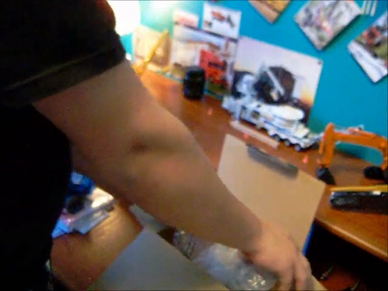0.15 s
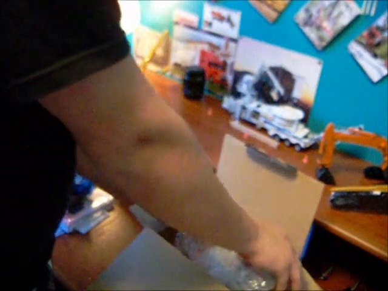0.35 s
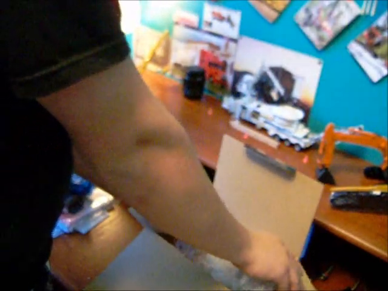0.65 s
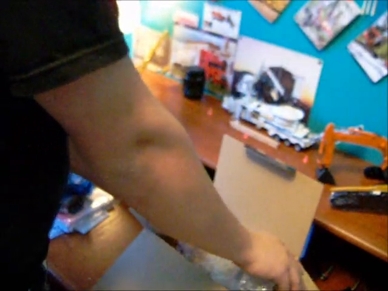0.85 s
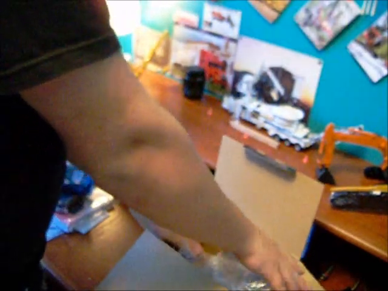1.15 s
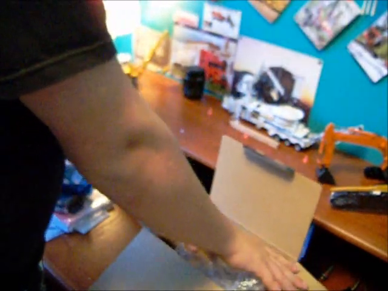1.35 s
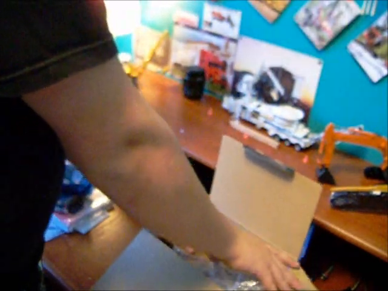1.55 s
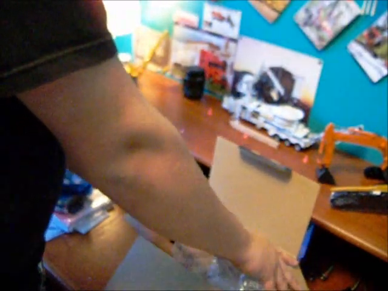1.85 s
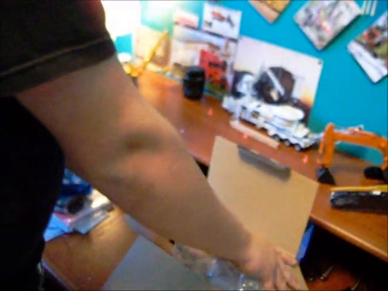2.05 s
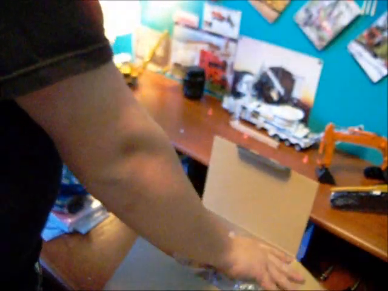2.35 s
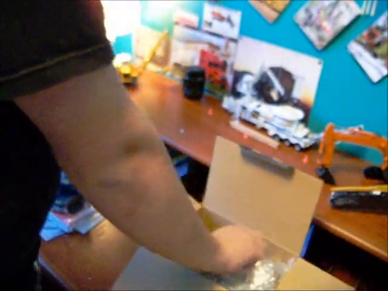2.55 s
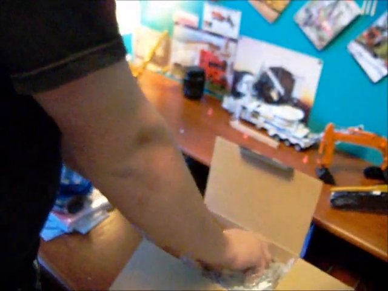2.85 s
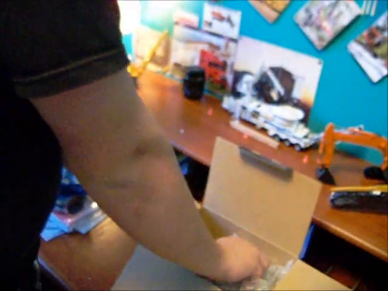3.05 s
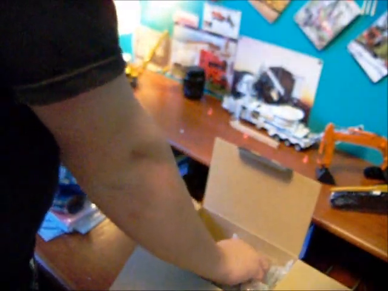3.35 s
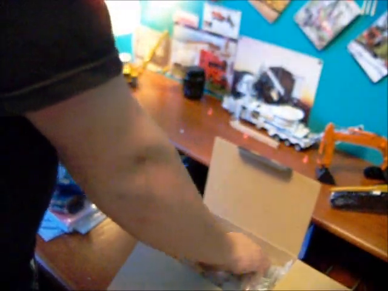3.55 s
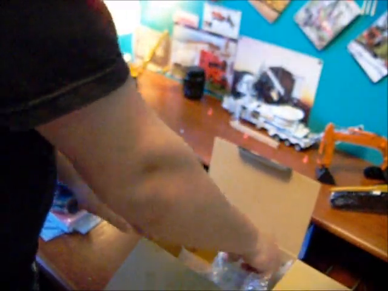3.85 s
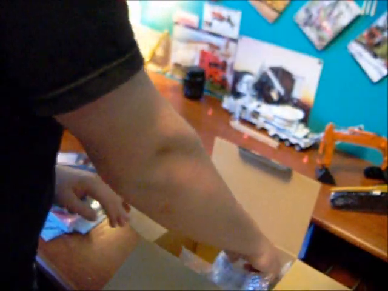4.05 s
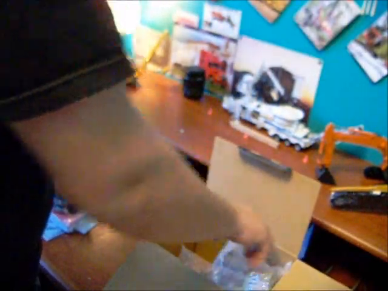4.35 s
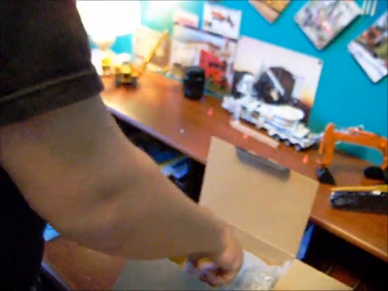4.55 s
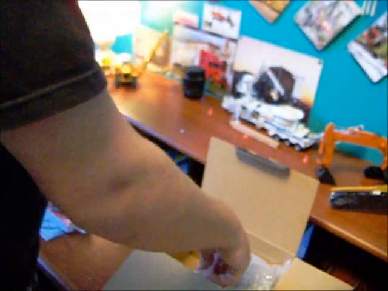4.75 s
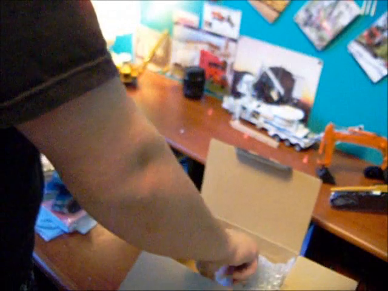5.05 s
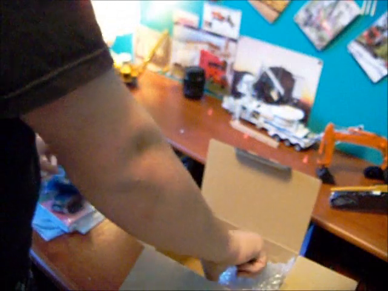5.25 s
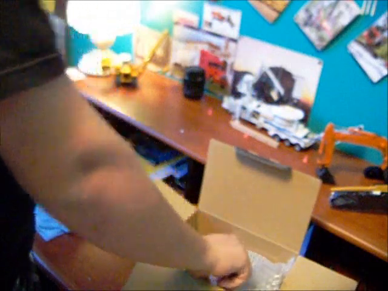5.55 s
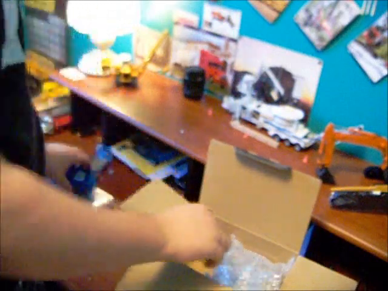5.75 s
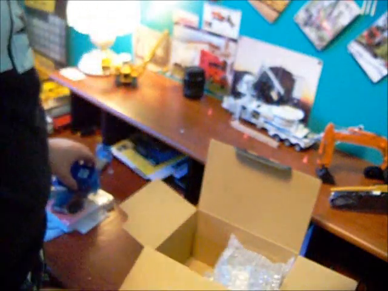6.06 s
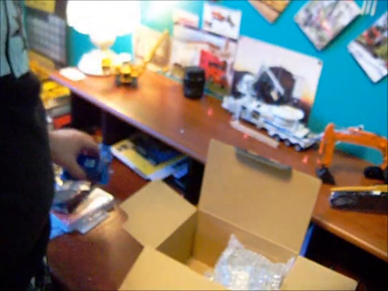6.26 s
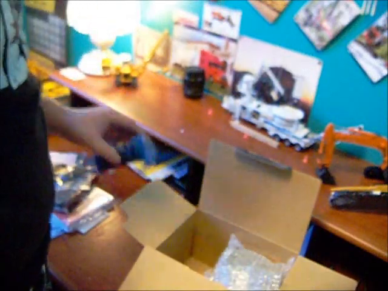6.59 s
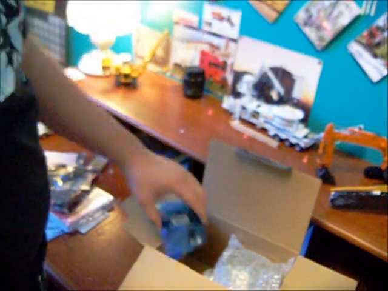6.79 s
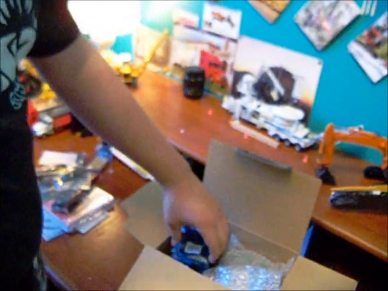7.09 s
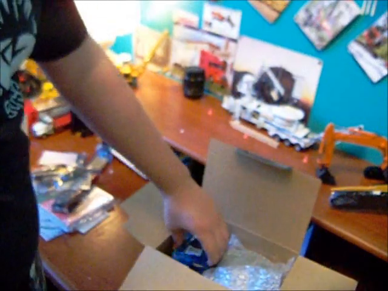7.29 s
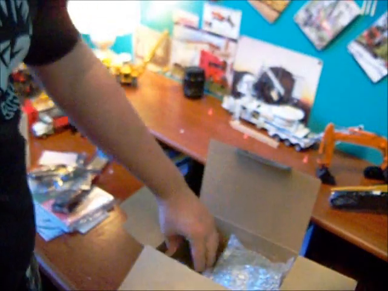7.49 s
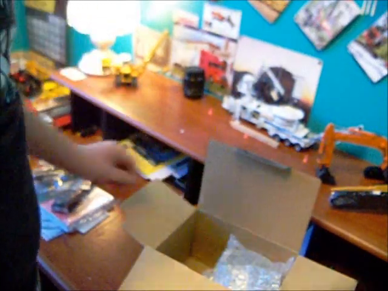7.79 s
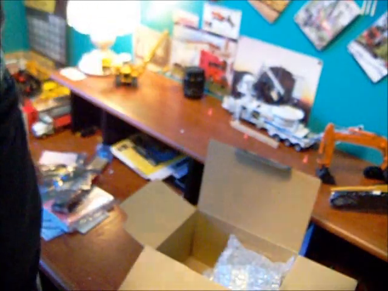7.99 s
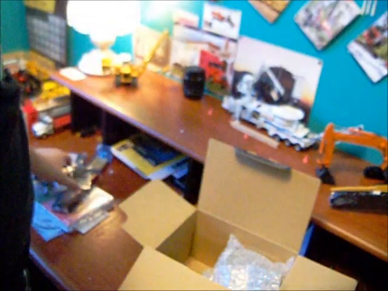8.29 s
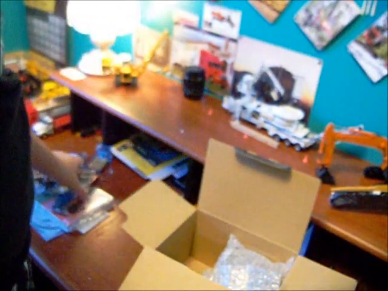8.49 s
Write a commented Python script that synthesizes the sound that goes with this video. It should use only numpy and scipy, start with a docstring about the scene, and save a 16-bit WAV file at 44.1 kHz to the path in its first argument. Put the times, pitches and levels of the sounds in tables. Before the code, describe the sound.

Close plastic film crackling, bright popping snaps and boxy cardboard thumps, thinning to near quiet before one last hard knock and rustle.

```python
"""Bubble wrap crinkles and snaps as hands press and fold it into a cardboard box on a desk, close to
a small camera's microphone. Crinkle is a crowd of tiny damped sines with hiss; each snap is a flurry of them.
Parts knock and drag on the hollow box, noise ringing through its panel resonances; plastic hisses in
narrow bands. A small room answers with decaying noise, over a gently unsteady rumble and hiss."""
import sys
import numpy as np
from scipy import signal
from scipy.fft import rfft, irfft, next_fast_len
from scipy.io import wavfile
from scipy.ndimage import map_coordinates

SR = 44100
rng = np.random.default_rng(int(sys.argv[2]) if len(sys.argv) > 2 else 0)


def unload_wav(signal):
    """Save mono or channel-first audio to the path in sys.argv[1] as 16-bit WAV at rate SR, clipped to [-1, 1]."""
    wavfile.write(
        sys.argv[1],
        SR,
        np.round(np.clip(np.atleast_2d(signal).T, -1, 1) * 32767).astype(np.int16),
    )


def volts(x):
    """Linear amplitude factor 10**(x/20) for a level x in dB, scalar or array-like."""
    e = np.asarray(x, float) / 20
    return 10 ** e


N = 380583

# loud creases of the film that snap: (time [s], level [dB], centre of its colour [Hz])
LOUD_SNAPS = [(0.2111, -27, 3980), (0.2444, -25, 3620), (0.2607, -29.5, 5800), (0.4961, -22, 2114),
              (0.5954, -16.5, 2450), (0.6088, -5.5, 2904), (0.6392, -9, 3410), (0.6745, -3, 2630),
              (0.6901, -6, 3670), (0.9224, -30, 6000), (0.9447, -31, 4500), (0.9654, -25, 6050),
              (0.7959, -26.5, 5600), (0.999, -24.5, 6100), (1.0336, -31, 5000), (1.2426, -32.5, 4800),
              (1.225, -29.5, 6100), (1.3433, -26, 5320), (1.3611, -22, 4200), (1.568, -32, 3300),
              (1.593, -23.5, 5040), (1.6197, -22, 2890), (1.77, -24.5, 5800), (1.878, -25, 5360),
              (1.9371, -21.5, 2500), (2.009, -28, 3330), (2.2925, -12, 3390), (2.3431, -15, 4120),
              (2.3584, -13.5, 5700), (2.4323, -15.5, 4800), (2.5606, -14.5, 6160), (2.5823, -12, 5160),
              (2.5924, -19.5, 4850), (2.652, -12, 6250), (2.7208, -24.5, 4900), (2.7548, -24.5, 5000),
              (2.766, -24.5, 3750), (2.809, -27, 5300), (2.828, -17, 6860), (2.8638, -25, 4650),
              (2.9026, -26, 5480), (2.9505, -24, 4600), (2.9582, -21.5, 5630), (2.9958, -19, 5750),
              (3.016, -18, 6130), (3.028, -21, 5100), (3.068, -22, 5030), (3.0924, -22, 5170),
              (3.1187, -23, 4770), (3.1256, -25, 4760), (3.153, -22.5, 5520), (3.1992, -30, 5920),
              (3.232, -32, 3400), (3.2371, -5, 3880), (3.3848, -29, 3910), (3.4953, -40, 2900),
              (3.547, -20, 2980), (3.5717, -19.5, 4920), (3.6161, -21.5, 4860), (3.693, -31, 5270),
              (3.7171, -15.5, 5300), (3.8478, -26, 3750), (3.7927, -27, 4500), (3.865, -22, 5500),
              (3.8756, -24, 5900), (3.915, -33, 6240), (3.9855, -24, 6230), (3.9985, -30, 6100),
              (4.055, -18, 3880), (4.0661, -16, 3250), (4.1236, -28.5, 3100), (4.217, -26, 2270),
              (4.263, -27, 4730), (4.354, -21, 5400), (4.3227, -16.5, 4900), (4.491, -16, 5080),
              (4.5021, -14.5, 5600), (4.6193, -10.5, 4770), (4.512, -21, 5550), (4.661, -22, 4960),
              (4.756, -22.5, 4340), (4.728, -24, 5800), (4.8912, -24.5, 4810), (4.9566, -15.5, 4080),
              (4.9808, -14.5, 3980), (5.0139, -12.5, 5330), (5.06, -19, 4940), (5.0701, -12.5, 4790),
              (5.108, -23.5, 5700), (5.3729, -14, 4000), (5.567, -21, 4670), (5.6013, -15, 3860),
              (5.6097, -13, 4500), (5.3217, -25, 4030), (5.4566, -31.5, 5200), (5.8062, -34, 4460),
              (5.96, -16.5, 3980), (6.2, -36.5, 2230), (6.2423, -37, 4940), (6.467, -37.5, 5200),
              (6.8159, -36.5, 4370), (6.8826, -20, 3090), (6.927, -19.5, 4500), (6.967, -24.5, 4250),
              (7.043, -18.5, 5200), (7.054, -25, 4700), (7.0993, -17.5, 4930), (7.103, -26.5, 5440),
              (7.12, -18.5, 4780), (7.1571, -20.5, 4450), (7.1383, -29.5, 4250), (7.2205, -20, 4580),
              (7.258, -31, 4400), (7.329, -18, 3620), (7.5013, -26, 5900), (7.53, -30, 2020),
              (7.5382, -4, 2780), (7.6124, -17, 2150), (8.386, -28, 3800), (8.5706, -29, 3160),
              (8.6077, -23, 3730)]
# blows on the box: (time [s], blow level [dB], panel struck [Hz], panel ring over the blow [dB],
# hardness as reach above the panel [octaves])
BOX_BLOWS = [(0.093, -43, 167, 3, 3.5), (0.492, -28.5, 489, -3, 1.6), (0.594, -17.5, 473, -3.5, 0.9),
             (0.635, -24, 414, -3, 1.4), (0.671, -18.5, 450, -1, 1.4), (0.688, -32, 405, -5, 1),
             (1.049, -39.5, 466, -9, 3), (1.616, -30, 1300, -5, 1.3), (1.649, -35, 323, 3, 0.98),
             (1.69, -42, 338, 1, 1.3), (1.728, -42, 427, 5, 0.61), (1.909, -37.5, 445, -4, 1.5),
             (1.933, -26, 742, 0.5, 1.4), (1.965, -35.5, 734, 2, 2.6), (2.287, -33.5, 530, -23, 0.91),
             (2.308, -35, 470, -1, 1.5), (2.585, -40.5, 471, 4, 1.1), (2.966, -38.5, 484, -2.5, 1.1),
             (3.238, -23, 460, -1.5, 1.9), (3.237, -26.5, 1210, 5, 0.9), (3.518, -39, 460, 3.5, 1.1),
             (4.065, -38.5, 489, -1.5, 2), (4.216, -29, 425, -1.5, 0.57), (4.251, -39, 423, -4, 0.79),
             (4.32, -34.5, 331, -5, 1.4), (4.519, -22.5, 325, -12, 4.2), (4.619, -35.5, 460, 12.5, 0.67),
             (4.68, -54, 487, 16, 1.2), (4.952, -36.5, 457, -3, 1.3), (4.981, -28.5, 446, -12, 3.5),
             (5.065, -39.5, 456, -2, 1.8), (5.371, -37, 564, 0.5, 1.5), (5.41, -42, 700, -3, 1.3),
             (5.601, -33, 460, -10, 0.99), (6.882, -22, 877, -5, 2), (6.886, -30.5, 134, -2, 1.1),
             (6.909, -31.5, 281, 3.5, 0.76), (6.987, -45, 178, 6, 1.2), (7.066, -44.5, 191, 6.5, 1.2),
             (7.326, -36.5, 740, -15, 2.1), (7.349, -34.5, 738, -4, 1.3), (7.532, -15, 348, 2, 0.62),
             (7.538, -25, 202, 2.5, 0.8), (7.54, -28, 1044, 4, 1.1), (7.542, -37, 116, 0.5, .8),
             (7.563, -32, 370, 6, 0.88), (7.586, -43, 326, -3, 1.3), (7.608, -28, 279, -1, 2.3)]
# hands pressing the film: (time [s], crinkle level [dB])
PRESSING = [(0, -39), (.25, -47), (.45, -41.5), (.8, -45.5), (1.2, -54), (1.55, -51.5), (2.1, -47),
            (2.7, -43), (3.2, -54.5), (3.45, -61), (4.2, -56), (4.86, -55), (5.2, -59), (5.5, -55),
            (5.76, -64), (6.1, -71), (6.78, -64), (7.0, -60), (7.28, -48), (7.6, -59), (7.75, -78),
            (8.36, -72), (8.63, -50)]


def unit(x):
    """Scale to rms 1."""
    return x / np.sqrt(np.mean(x ** 2) + 1e-20)


def along(points, hz):
    """(Hz, value) points read on a log frequency axis."""
    f, v = np.transpose(points)
    return np.interp(np.log(hz + 1), np.log(f + 1), v)


def filtered(x, response):
    """x shaped by a complex response of frequency."""
    m = next_fast_len(N + SR // 2)
    return irfft(rfft(x, m) * response(np.fft.rfftfreq(m, 1 / SR)), m)[:N]


def wobble(rate):
    """A smooth random curve, rate knots a second."""
    knots = rng.standard_normal(int(N * rate / SR) + 4)
    return map_coordinates(knots, [np.arange(N) * rate / SR])


def bursts(s, shapes):
    """Rows of samples added at their times s."""
    where = np.round(s * SR).astype(int)[:, None] + np.arange(shapes.shape[1])
    return np.bincount(where.ravel(), shapes.ravel(), N + SR)[:N]


def grains(s, hz, size, cycles, count):
    """Damped sines of count samples, each falling to 1/e in the given cycles."""
    turns = np.outer(hz / SR, np.arange(count))
    return bursts(s, size[:, None] * np.sin(2 * np.pi * turns) * np.exp(-turns / cycles))


def floor():
    """Low rumble of the house and hiss of the microphone: shaped noise, gently unsteady."""
    # rumble and hiss: (frequency [Hz], relative spectral level [dB])
    floor_colour = [(10, -8), (25, 1), (60, -1.5), (150, -5.5), (300, -12.5), (600, -20), (1500, -25.5),
                    (4000, -29.5), (8000, -32.5)]
    noise = filtered(rng.standard_normal(N), lambda f: volts(along(floor_colour, f)))
    return volts(-50 + 0.37 * wobble(3.5)) * unit(noise)


def room(x):
    """The walls' answer: noise tails in which each frequency dies at its own speed."""
    # decay of the room: (frequency [Hz], t60 [s])
    decay = [(150, 0.22), (700, 0.38), (2000, 0.25), (7000, 0.13)]
    wet, step = np.zeros(N + SR), SR // 4
    # the source moves, so every quarter second has a new tail
    for start in range(0, N, step):
        hz, t, z = signal.stft(rng.standard_normal(SR // 2), SR, nperseg=256)
        t60 = along(decay, hz)[:, None]
        tail = signal.istft(z * volts(-60 * t / t60), SR, nperseg=256)[1]
        echo = signal.fftconvolve(x[start:start + step], tail / np.linalg.norm(tail))
        wet[start + 130:][:len(echo)] += echo  # the walls answer about 3 ms late
    return wet[:N]


def box(x):
    """The hollow box rings at its panel and cavity resonances."""
    # panels and cavity: (frequency [Hz], width [Hz], level [dB])
    panels = [(122.5, 17, -12), (209, 31, -6.5), (323.4, 45, -7), (460, 53, -5), (583, 95, -8.5),
              (715, 333, -11.5), (1080, 275, -12), (1300, 335, -11), (1880, 500, -20.5)]

    def response(f):
        total = 0
        for k, (centre, width, db) in enumerate(panels):
            damping = 1j * f * width
            total = total + (-1) ** k * volts(db) * damping / (centre ** 2 - f ** 2 + damping)
        return total

    return filtered(x, response)


def knocks():
    """A blow is a rough push into the box around the panel struck: hard contact reaches higher, the panel rings on."""
    s, db, hz, panel_db, hardness = np.transpose(BOX_BLOWS)
    t = np.arange(2048) / SR
    envelope = np.exp(-t / 0.00376) * (1 - np.exp(-t / 0.0026))  # contact fall and rise times [s]
    push = rng.standard_normal((len(s), len(t))) * envelope
    # second-order low cut near the panel, high cut at the reach of the contact
    ratio = 1j * np.fft.rfftfreq(2 * len(t), 1 / SR) / hz[:, None]
    low = ratio * 1.03
    high = ratio / 2 ** np.clip(hardness, 0, 4)[:, None]
    push = irfft(rfft(push, 2 * len(t)) * (low / (1 + low)) ** 2 / (1 + high) ** 2)
    push /= np.linalg.norm(push, axis=1, keepdims=True)
    blows = bursts(s, 50 * volts(db)[:, None] * push)
    panel_ring = grains(s + 0.0012, hz, volts(db + panel_db), 4.6, count=4000)
    return box(blows) + 0.071 * blows + panel_ring


def swishes():
    """Plastic sliding on card hisses in a narrow band for a moment."""
    # slides: (start [s], end [s], centre [Hz], spread [Hz], level [dB])
    slides = [(4.537, 4.537, 1840, 201, -27), (5.808, 5.962, 5140, 600, -51.5),
              (5.964, 6.02, 2480, 500, -57), (7.43, 7.482, 4100, 910, -45.5)]
    t, out = np.arange(N) / SR, np.zeros(N)
    for start, stop, hz, width, db in slides:
        hiss = filtered(rng.standard_normal(N), lambda f: np.exp(-.5 * ((f - hz) / width) ** 2))
        envelope = np.interp(t, [start, start + 0.0032, stop, stop + 0.024], [0, 1, 1, 0])
        out += volts(db) * unit(hiss) * envelope
    return out


def squeezes(s):
    """Squeezing the film swells its crinkle: summed power of fine crinkle and large folds at times s."""
    # squeezes: (peak time [s], level [dB], rise [dB/s], fall [dB/s], large folds over fine crinkle [dB])
    swells = [(.08, -46.5, 89, 102.5, 5), (.514, -41.5, 302, 103, 2.5), (.603, -32.5, 900, 171.5, 2),
              (.694, -40, 198, 200, 0.5), (.98, -42, 81, 55, -4), (1.05, -49.5, 100, 118, 3),
              (1.324, -42, 100, 34, -4), (1.639, -43.5, 153, 28, 0.5), (1.936, -34.5, 500, 140, -7),
              (2.178, -36, 111, 110, -5), (2.307, -33, 170, 55, 0.5), (2.43, -46, 102, 118, -3),
              (2.58, -24.5, 350, 330, -9), (2.875, -40, 118, 120, -6), (2.966, -39.5, 300, 56, -2),
              (3.04, -38, 103, 141, -2), (3.138, -42, 136, 190, -10), (3.254, -32.5, 1097, 225, 1),
              (3.542, -48.5, 205, 65, -1), (3.632, -45.5, 65, 300, 5.5), (3.732, -42, 162, 42, -4),
              (3.87, -38.5, 46, 75, -8), (4.076, -43.5, 252, 110, -7.5), (4.343, -33.5, 148, 203, -5),
              (4.495, -32, 1003, 38, -0.5), (4.624, -35.5, 200, 90, -12), (4.735, -31.5, 500, 44, -5),
              (4.815, -37.5, 60, 252, -3), (4.895, -40, 300, 100, -9), (4.97, -28.5, 140, 156, -4.5),
              (5.07, -29, 500, 170, -5.5), (5.268, -39.5, 124, 66, -6.5), (5.38, -40.5, 377, 90, 0),
              (5.607, -40.5, 73, 128, 2), (5.84, -49.5, 130, 48, 2.5), (5.979, -50.5, 100, 210, 9.5),
              (6.236, -59, 270, 60, 3), (6.89, -44.5, 250, 53, 6.5), (6.974, -51.5, 75, 300, 5),
              (7.114, -43, 150, 50, -5), (7.348, -51, 104, 220, 10.5), (7.44, -63, 300, 43, 8),
              (7.508, -38, 250, 116, 5.5), (8.396, -48, 1000, 123, 2), (8.471, -53.5, 115, 280, 5.5),
              (8.588, -42.5, 122, 300, 6)]
    peak, db, rise, fall, folds_db = np.transpose(swells)
    since = s[:, None] - peak
    drop_db = np.where(since > 0, np.abs(fall) * since, -np.abs(rise) * since)
    power = volts(db - drop_db) ** 2
    return power.sum(axis=1), (power * volts(folds_db) ** 2).sum(axis=1)


def small_snaps(count=140):
    """Lesser creases snap at chance moments, their level following the pressing: rows like the loud ones."""
    z = rng.standard_normal((count, 2))
    s = rng.random(count) * (N / SR - .1)
    crinkle_db = 10 * np.log10(volts(np.interp(s, *np.transpose(PRESSING))) ** 2 + squeezes(s)[0])
    db = crinkle_db + 8 + 2.5 * z[:, 0]  # 8 dB over the crinkle of the moment, spread 2.5 dB
    hz = 5200 * np.exp(.15 * z[:, 1])
    return np.transpose([s, db, hz])


def snaps(count=24):
    """A crease lets go in a flurry: ticks all over its colour range within a few ms, the first ones strongest."""
    s, db, hz = np.vstack([LOUD_SNAPS, small_snaps()]).T
    # lower creases let go more slowly
    flurry_s = np.clip(.7 * (4500 / hz) ** 1.6, .2, 8) * 1.5 / 1000
    draw = rng.random((len(s), 3, count))
    place = draw[:, 0].argsort(1) / (count - 1) - .5  # shuffled even places in the colour range
    late = -np.log(1 - draw[:, 1]) * np.arange(count) / count  # in flurry lengths
    pitch = np.clip(hz[:, None] * np.exp(1.095 * place), 700, 9000)
    sign = np.sign(draw[:, 2] - .5)
    size = volts(db[:, None] - 1.9 * late) * 0.24 * (pitch / hz[:, None]) ** .6 * sign
    when = s[:, None] + late * flurry_s[:, None]
    # the first, broad break
    crack = grains(s, np.full(len(s), 6000), 0.38 * volts(db), 0.5, count=40)
    return crack + grains(when.ravel(), pitch.ravel(), size.ravel(), 2.3, count=160)


def crinkle(count, spread_db, clump_db):
    """Countless tiny creases buckle at random, a few much louder than the rest, in clumps."""
    # colour of the crinkle: (frequency [Hz], relative spectral level [dB])
    film_colour = [(300, -41), (1000, -15), (2000, -2.5), (3500, 0.5), (5000, 2.5), (7000, 5), (9000, 4)]
    u = rng.random((count, 3))
    hz = 1200 * (9000 / 1200) ** u[:, 1]
    size = volts(-spread_db * np.log(1 - .995 * u[:, 2])) * np.sqrt(hz)
    ticks = unit(grains(u[:, 0] * N / SR, hz, size, 2.44, count=64))
    sheet = ticks + .5 * rng.standard_normal(N)  # film sliding on film
    sheet = filtered(sheet, lambda f: volts(along(film_colour, f)))
    return unit(sheet * volts(clump_db * wobble(25) + 1.75 * wobble(90)))


def level_db(curve, events, after_db, t60, s):
    """A slow level curve plus a dying wake behind each event, read at times s."""
    since = s[:, None] - np.array([row[0] for row in events])
    wake_db = np.array([row[1] for row in events]) + after_db - 60 * since / t60
    wake = np.where(since > 0, volts(np.minimum(wake_db, 0)) ** 2, 0).sum(axis=1)
    return 10 * np.log10(volts(np.interp(s, *np.transpose(curve))) ** 2 + wake)


def hands():
    """Pressing crinkles the film, large folds sound lower; dragging rasps the cardboard and drives the box."""
    # drag on the cardboard: (time [s], level [dB])
    dragging = [(0.0, -49), (0.43, -55.5), (0.65, -43.5), (0.81, -70), (1.34, -68), (1.87, -53),
                (2.43, -48.5), (2.66, -58), (3.99, -58.5), (4.71, -49.5), (5.29, -56.5), (5.48, -53),
                (6.13, -66), (6.61, -63.5), (7.55, -55), (7.76, -71), (8.29, -67.5), (8.63, -50.5)]
    s = np.arange(0, N, 64) / SR
    # the film rustles on after a loud snap; the contents scrape and settle after a blow
    film_db = level_db(PRESSING, LOUD_SNAPS, after_db=-25, t60=0.2, s=s)
    drag_db = level_db(dragging, BOX_BLOWS, after_db=-13, t60=0.25, s=s)
    # the share of large folds grows with drag over crinkle
    folds_db = film_db - 0.5 + 0.31 * (drag_db - film_db)
    fine, large = np.sqrt(volts([film_db, folds_db]) ** 2 + squeezes(s))
    t = np.arange(N) / SR
    fine, large, drag = [np.interp(t, s, curve) for curve in (fine, large, volts(drag_db))]
    rasp = unit(box(rng.standard_normal(N) * volts(2.1 * wobble(40))))
    film = crinkle(count=26000, spread_db=3.1, clump_db=1.12)
    low = filtered(film, lambda f: 1 / (1 + (f / 3300) ** 4))
    return fine * (film - low) + large * low + drag * rasp


def scene():
    """All handling sounds close to the microphone, their room and the floor."""
    near = hands() + snaps() + swishes() + knocks()
    return (near + volts(-8.0) * room(near) + floor())[None]


def low_pass(x):
    """Removes everything above the highest recorded frequency."""
    return signal.sosfilt(signal.butter(12, 8540, fs=SR, output="sos"), x)


def record(dry):
    """The camera rounds off the loudest peaks, then its steep top end closes the band."""
    # steep top end: (frequency [Hz], level [dB])
    top_end = [(7200, -0.5), (7700, -6), (8100, -30), (8500, -50), (9500, -76)]
    rounded = dry[0] / (1 + np.abs(dry[0] / .4) ** 3) ** (1 / 3)  # peaks approach 0.4
    mix = filtered(rounded, lambda f: volts(along(top_end, f)))[None]
    return low_pass(mix)


dry = scene()
out = record(dry)
unload_wav(out)
```